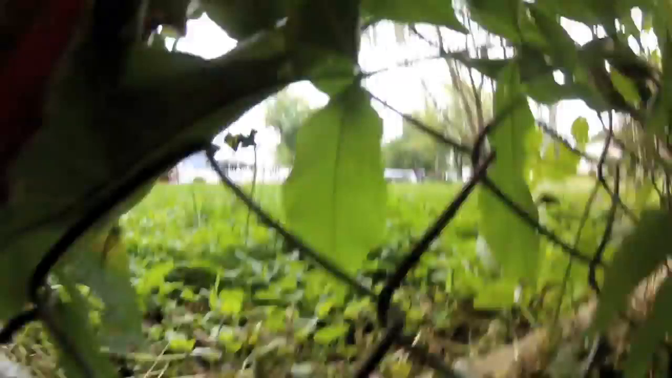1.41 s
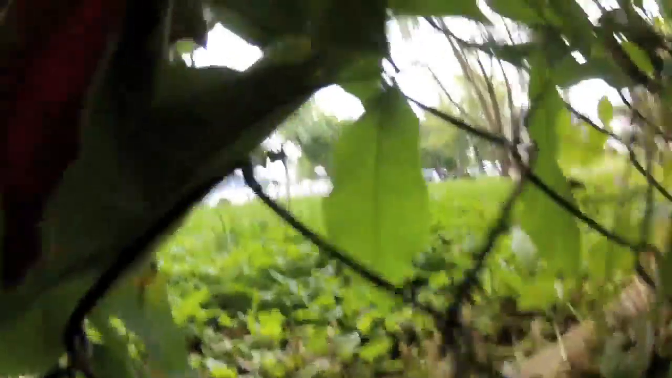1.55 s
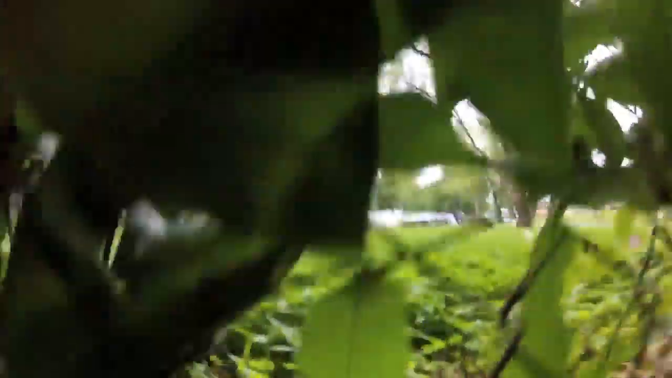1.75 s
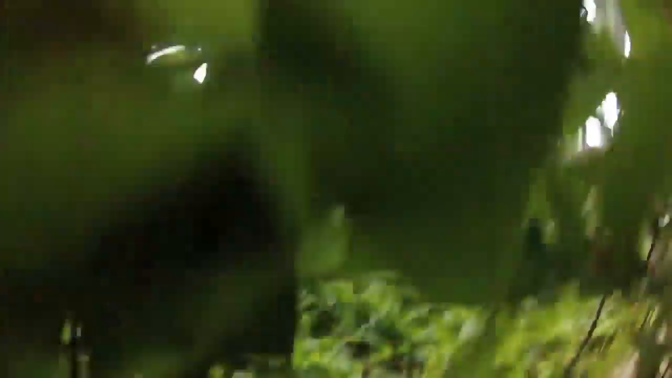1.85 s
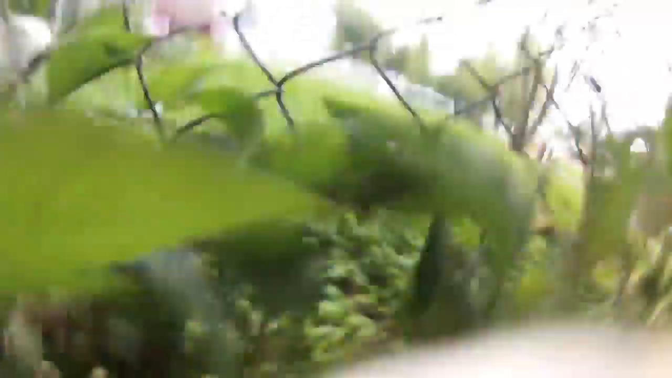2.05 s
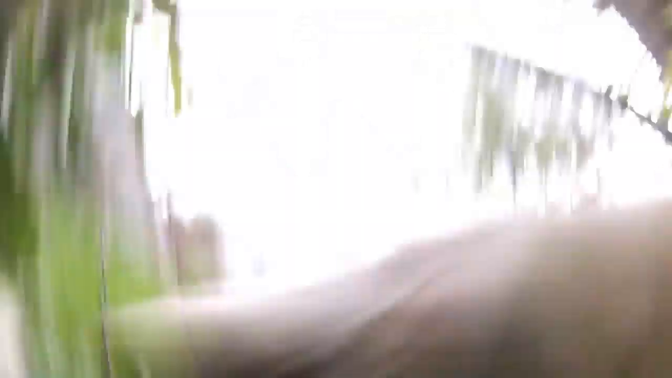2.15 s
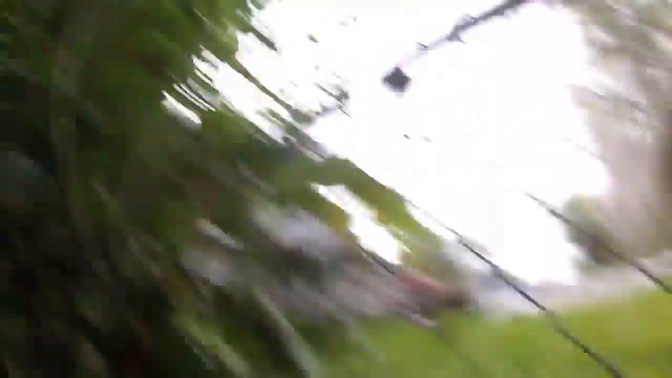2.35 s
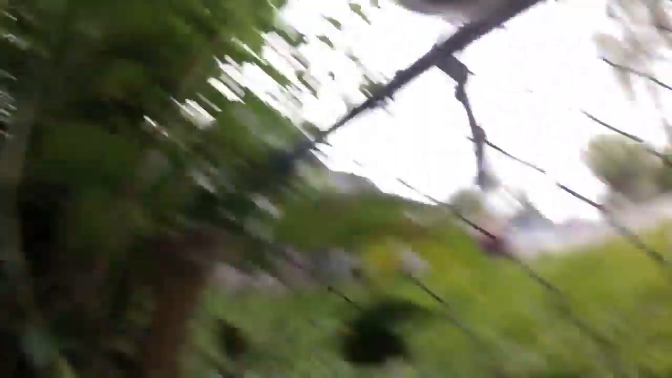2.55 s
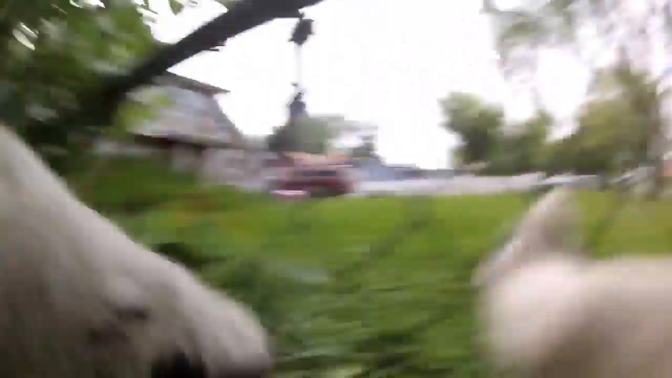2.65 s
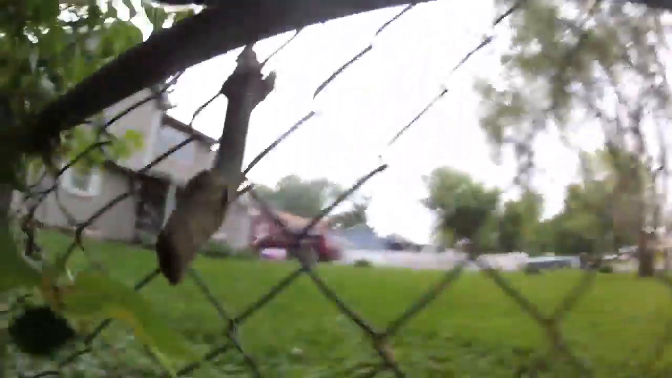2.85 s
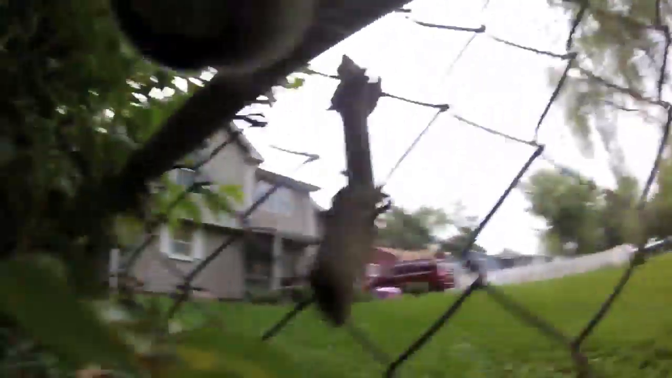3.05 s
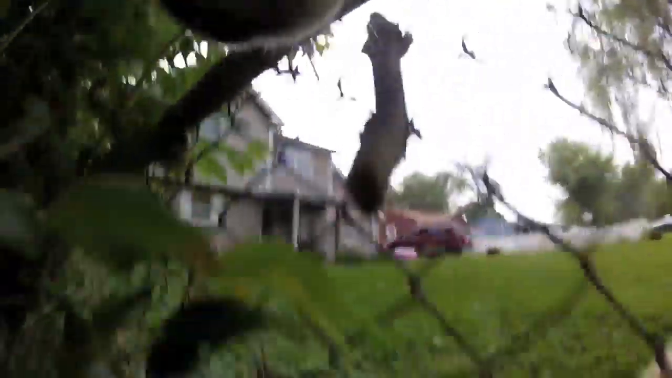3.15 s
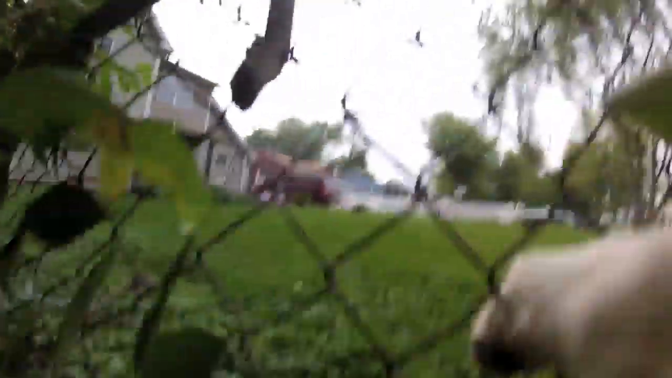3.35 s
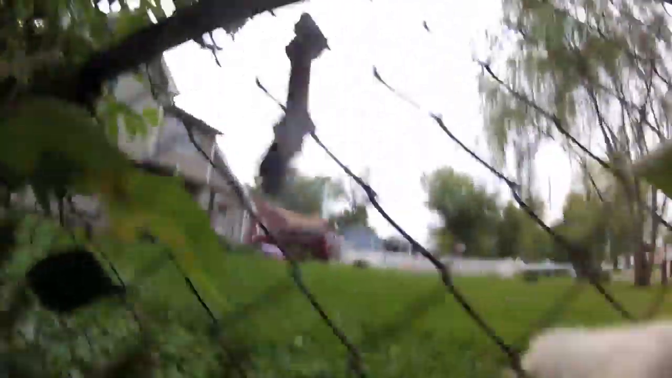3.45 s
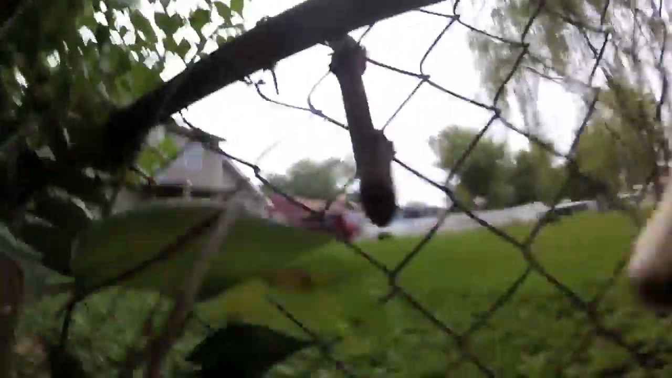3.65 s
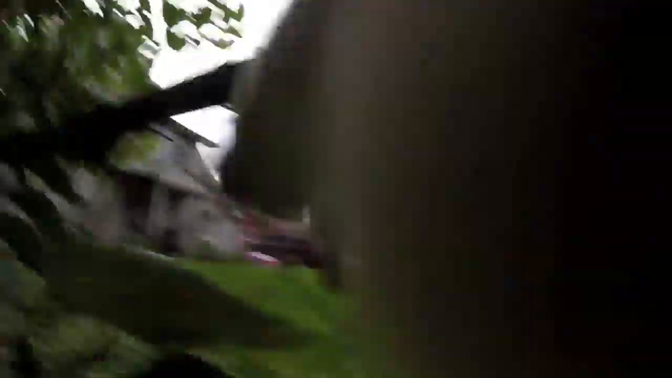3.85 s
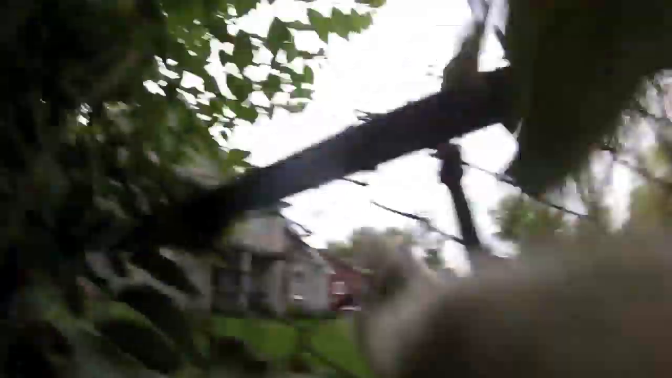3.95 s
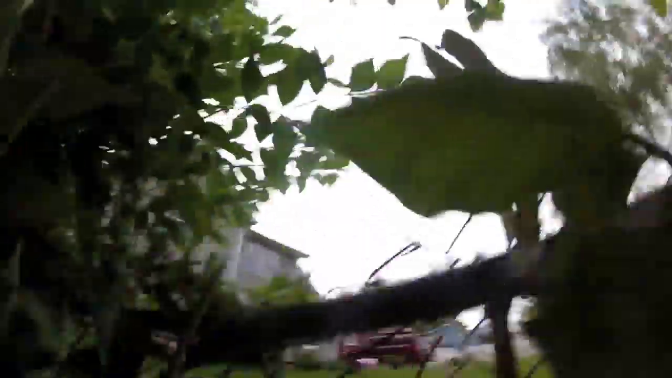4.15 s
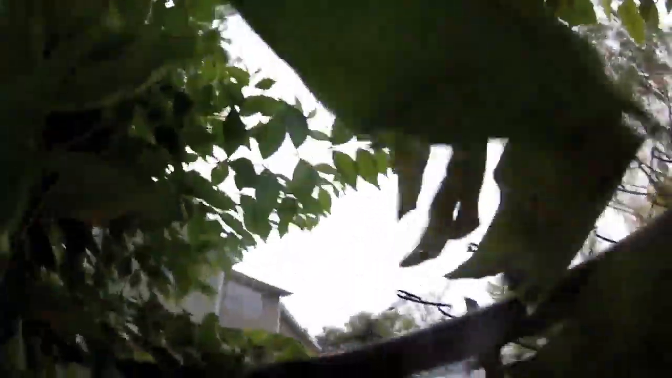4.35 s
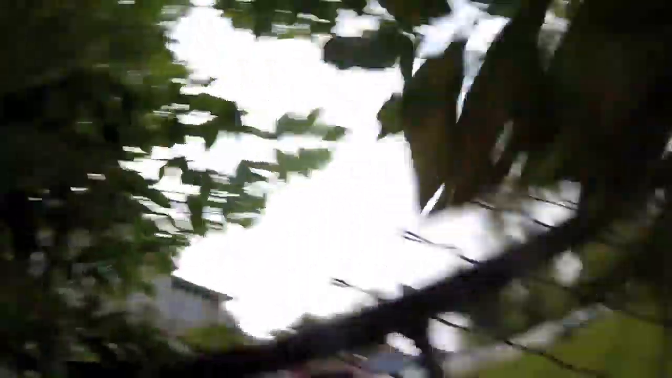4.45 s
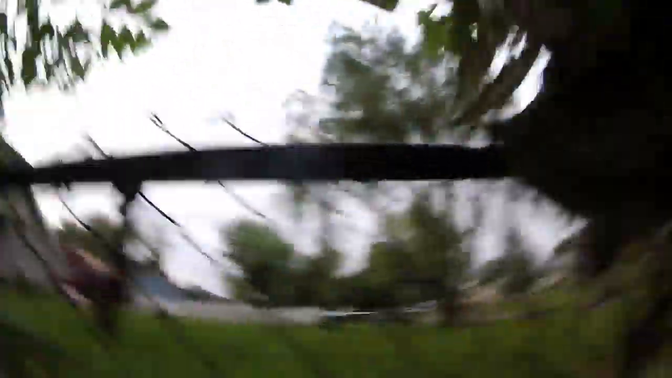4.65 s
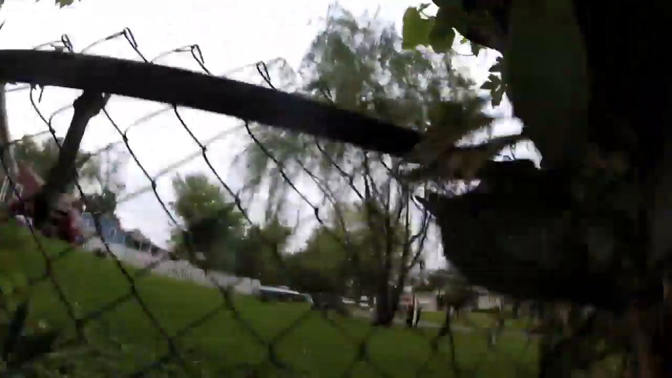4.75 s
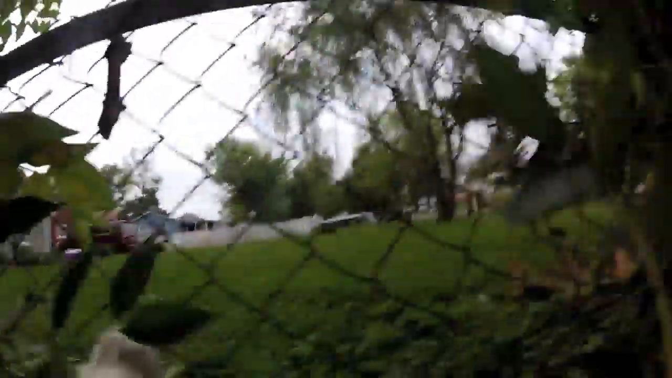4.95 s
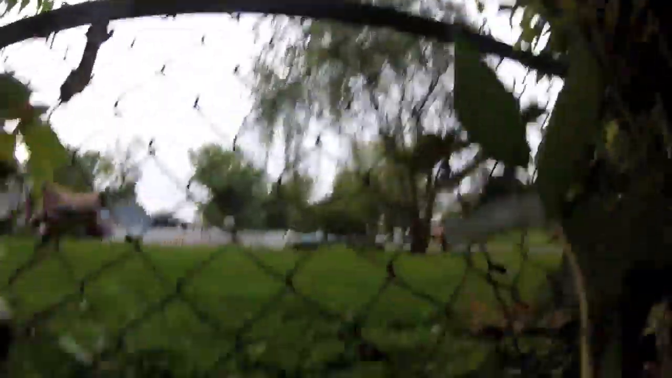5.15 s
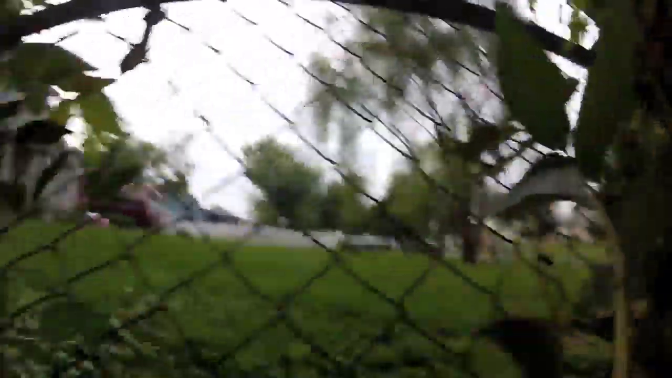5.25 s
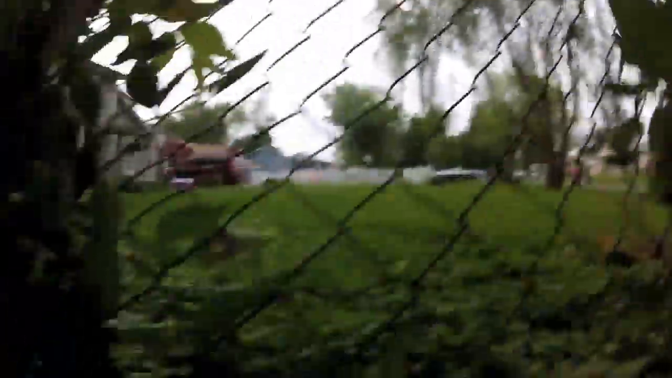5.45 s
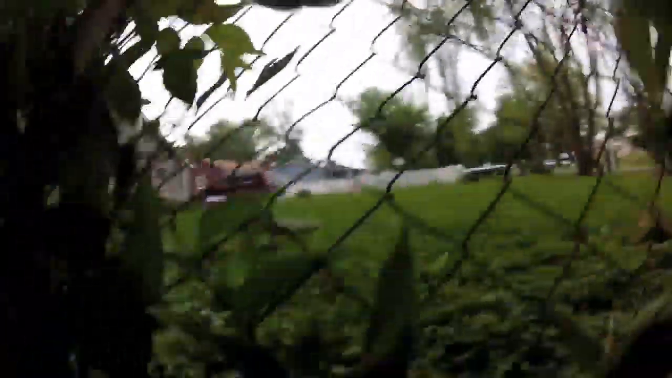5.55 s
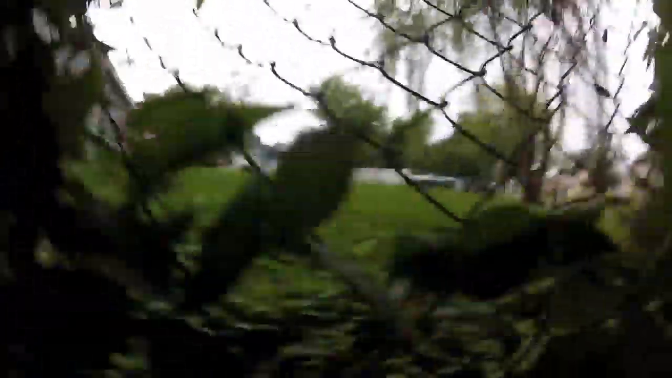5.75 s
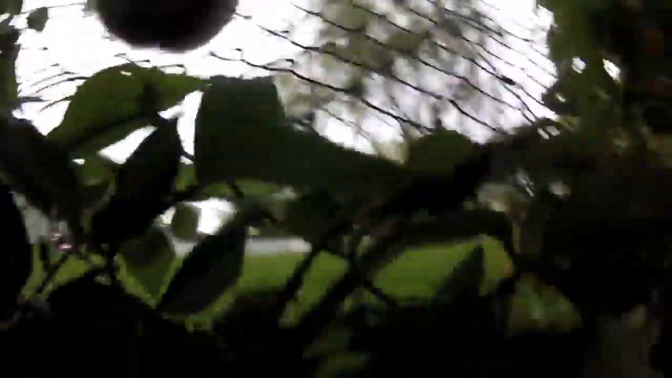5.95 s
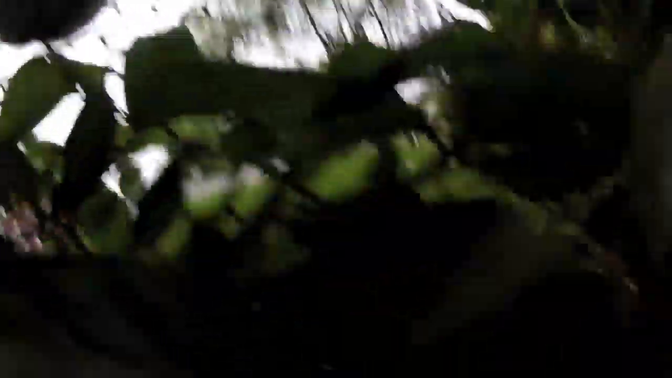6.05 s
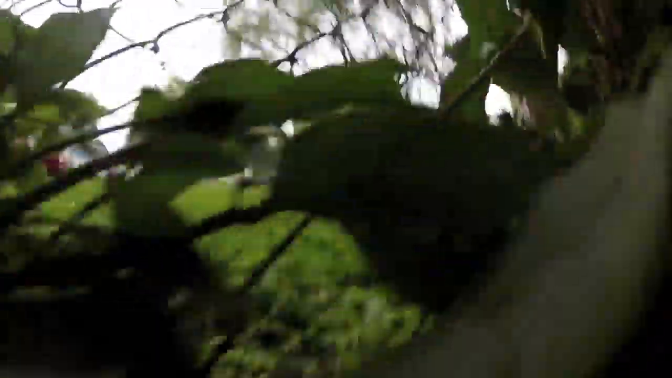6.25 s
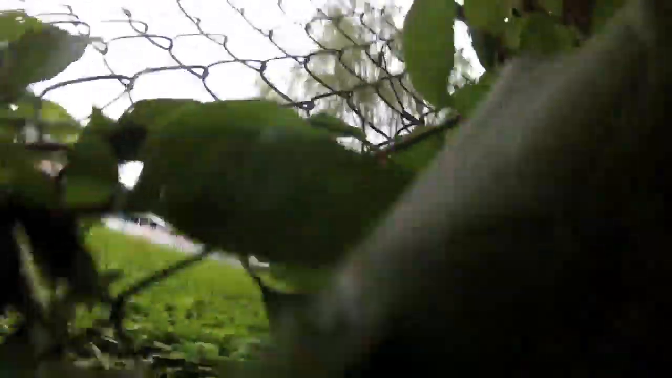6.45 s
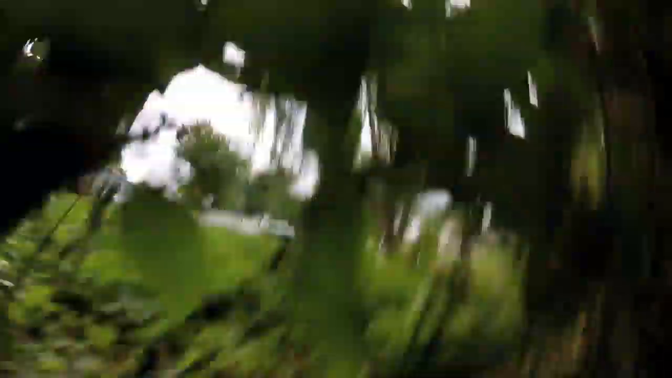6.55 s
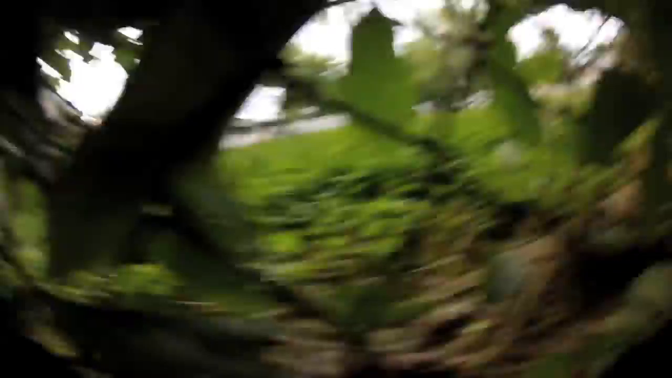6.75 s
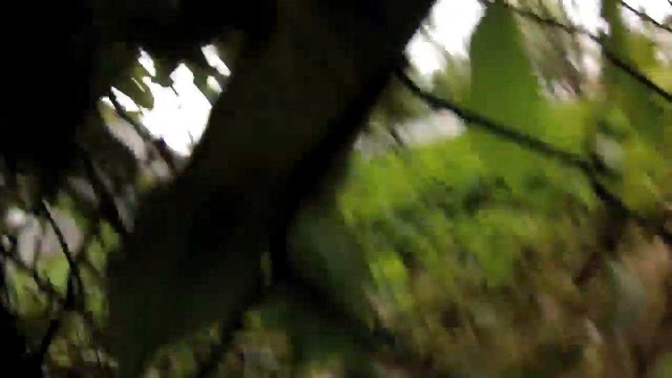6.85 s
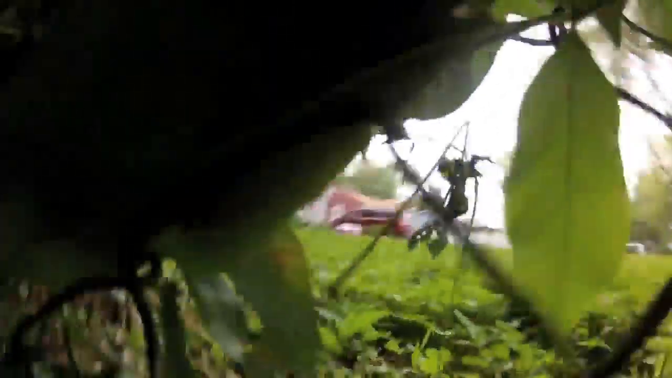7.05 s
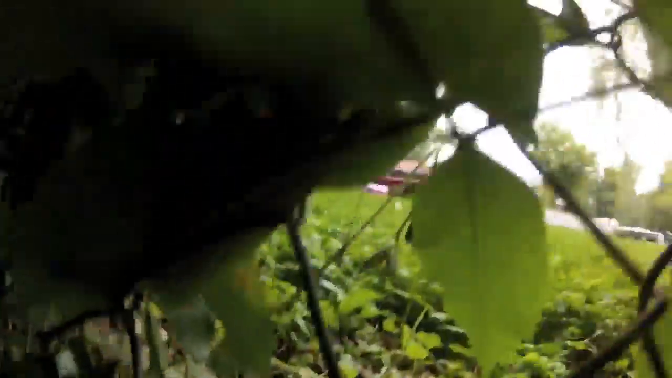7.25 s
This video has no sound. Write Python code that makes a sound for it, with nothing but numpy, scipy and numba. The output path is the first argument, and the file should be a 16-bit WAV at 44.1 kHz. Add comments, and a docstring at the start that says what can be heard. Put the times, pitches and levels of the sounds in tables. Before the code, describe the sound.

Leaves brush softly over a hard little case while stiff twigs click it. A sudden heavy blow at two seconds brings a cluster of cracks and scrapes, followed by quieter rubbing. A second burst of ratcheting ticks, short scrapes and tiny stem squeaks comes around five and a half to six seconds. Outdoors, but all contact sound at the microphone, without echo.

```python
"""Faint brushing and scattered dry ticks come first; about two seconds in, harder blows knock and rattle.
An animal carrying a small camera pushes through brush along a wire fence.
Twigs, stems and leaf tips ring the mount, shell, edge and microphone port as banks of resonances.
Leaves drag in bursts of tiny random slips and stems squeak as gliding tones.
The hardest blows overload the recorder: low pulses thump, the gain ducks and the peaks clip softly."""
import sys
import numpy as np
from scipy import signal
from scipy.fft import rfft, irfft, next_fast_len
from scipy.io import wavfile
from scipy.ndimage import map_coordinates
from numba import njit

SR = 44100
rng = np.random.default_rng(int(sys.argv[2]) if len(sys.argv) > 2 else 0)


def master_out(mix):
    """Clip the mix to full scale and print it as 16-bit PCM to the path in sys.argv[1]."""
    frames = np.transpose(np.atleast_2d(mix))
    ceiling = np.clip(frames, -1, 1)
    pcm = np.round(ceiling * 32767).astype(np.int16)
    wavfile.write(sys.argv[1], SR, pcm)


N = 322812


def amp(db):
    """Decibels to gain."""
    return 10 ** (np.asarray(db) / 20)


def unit(x):
    """Scale to rms 1."""
    return x / np.sqrt(np.mean(x ** 2) + 1e-20)


def colour(points):
    """Gain against frequency, drawn through (frequency [Hz], level [dB]) points on a log axis."""
    point_hz, db = np.transpose(points)
    return lambda hz: amp(np.interp(np.log(hz + 1), np.log(point_hz), db))


def filtered(x, response):
    """Shape the spectrum of x by a response of frequency; the padding keeps tails from wrapping round."""
    size = next_fast_len(N + 8192)
    hz = np.fft.rfftfreq(size, 1 / SR)
    return irfft(rfft(x, size) * response(hz), size)[:N]


def wobble(rate):
    """A smooth random curve with rate knots a second."""
    knots = rng.standard_normal(int(N * rate / SR) + 4)
    return map_coordinates(knots, [np.arange(N) * rate / SR])


def add(track, s, sound):
    """Mix a sound in at time s [s]."""
    start = max(round(s * SR), 0)
    part = track[start:start + len(sound)]
    part += sound[:len(part)]


def resonances(modes):
    """Causal response of a bank of damped modes with alternating signs."""
    def response(f):
        total = 0
        for k, (centre, width, db) in enumerate(modes):
            damping = 1j * f * width
            total = total + (-1) ** k * amp(db) * damping / (centre * centre - f * f + damping)
        return total
    return response


def ring(modes, force, scatter_db, detune):
    """Decaying modes rung by a force; each point of impact favours other modes and shifts their pitch."""
    t = np.arange(len(force)) / SR
    hz, width, db = np.transpose(modes)[:, :, None]
    size, shift = rng.uniform(-0.85, 1, (2, len(modes), 1))
    sign = (-1) ** np.arange(len(modes))[:, None]
    decay = np.exp(-np.pi * width * t)
    tones = np.sin(2 * np.pi * hz * (1 + detune * shift) * t)
    waves = sign * width * amp(db + scatter_db * size) * decay * tones
    sound = signal.fftconvolve(waves.sum(0), force)[:len(t)]
    # every ring carries the energy of 6 ms at rms 1
    return sound / np.sqrt(np.sum(sound ** 2) / (.006 * SR))


def friction(rate, spread_db, smooth):
    """Tiny slips of unequal size, on average rate a second, over a smooth hiss."""
    happens = rng.random(N) < rate / SR
    sign = rng.choice([-1, 1], N)
    size = amp(spread_db * np.clip(rng.standard_normal(N), -2, 2))
    return unit(unit(happens * sign * size) + smooth * rng.standard_normal(N))


# twigs striking the case: (time [s], shell ring level [dB], edge ring level [dB re shell])
TWIG_HITS = [(0.0368, -49, -10), (0.4018, -31.5, -16), (0.4659, -49.5, -23), (0.6607, -45.5, -23),
             (0.862, -57, -3), (1.0464, -47, -16), (1.2903, -32, -10.5), (1.449, -58, -11.5),
             (1.629, -32, -7.5), (1.798, -51.5, -5), (1.9136, -35, -12), (2.0566, -23.5, -2),
             (2.0723, -21.5, 1.5), (2.1261, -45.5, 0.5), (2.144, -39.5, -3.5), (2.2236, -29, 2.5),
             (2.2468, -28.5, -21), (2.2555, -45.5, 9.5), (2.2808, -30, 2), (2.3104, -41, -1),
             (2.3354, -57, 4), (2.4327, -41, 4), (2.5929, -34.5, 0.5), (2.6426, -46, -3),
             (2.6919, -33, 3.5), (2.697, -38, -15), (2.7212, -33, 3.5), (2.74, -41.5, 2.5),
             (2.7696, -41, 1.5), (2.902, -52.5, -2), (3.1481, -51, -1.5), (3.9131, -29, 0),
             (3.9579, -36, 0), (4.001, -42.5, -0.5), (4.0101, -42, -1), (4.3002, -36.5, -8),
             (4.6742, -57, 2.5), (5.045, -56.5, -4.5), (5.221, -54, -24), (5.4138, -45.5, -3),
             (5.4953, -45, -8), (5.6395, -37.5, -5), (5.6507, -30, -0.5), (5.7393, -39, 5),
             (5.7602, -31.5, 4), (5.7887, -39.5, -0.5), (5.8528, -30.5, -3.5), (5.9403, -28.5, -2.5),
             (5.9941, -48, -22), (6.056, -47, -1), (6.0826, -45, -20), (6.2645, -53.5, -1.5),
             (6.3218, -54, -3), (6.5735, -46, -11), (6.6081, -49, -13), (6.8329, -45, 0),
             (6.8885, -51.5, 3), (7.015, -28.5, -0.5), (7.068, -35, -10), (7.0882, -30.5, -10)]


def twigs(ordinary_db=-46.5, knock_db=-5, knock_fall=0.31):
    """Stiff twigs snap against the case; the harder they hit, the smaller the mount's share of the blow."""
    out = np.zeros(N)
    for s, db, edge in TWIG_HITS:
        # a twig of ordinary_db knocks the mount by knock_db re shell; knock_fall is dB less per dB harder
        knock = knock_db - knock_fall * (db - ordinary_db)
        add(out, s - LEAD_S, strike(db, edge, knock))
    return out


# resonances of the camera's mount, shell, edge and microphone port:
# (frequency [Hz], width [Hz], level [dB])
MOUNT_MODES = [(213, 234, -16), (401, 68, 1), (583, 188, -7), (668.5, 71, 1.5), (936, 170, -11.5)]
SHELL_MODES = [(1200, 130, -12.5), (1696, 155, -3), (2055, 190, 1), (2171, 165, 2.5)]
EDGE_MODES = [(2620, 133, -1.5), (2966, 93, -13.5), (3194, 73, -17.5), (3530, 160, -12), (3686, 220, -15),
              (4124, 130, -18.5), (5100, 170, -24)]
PORT_MODES = [(7800, 950, -30), (8520, 110, -6), (9100, 69, -9), (9346, 160, -1), (9884, 130, 0.5),
              (10120, 240, -6), (11430, 400, -3), (12970, 560, -11), (13210, 300, 4), (13600, 450, 1),
              (14760, 76, -3.5)]
LEAD_S = .004  # grazing time before the blow [s]


def strike(db, edge, knock, graze=0.0086, port_db=-11, crack_db=-13, crack_life=0.0023):
    """A contact grazes the case, hits with a dry crack, skids briefly and rings every part of it."""
    skid, skid_time = .07, .0028  # force re blow, fading time [s]
    t = np.arange(SR // 25) / SR - LEAD_S
    strength = np.where(t < 0, graze * (1 + t / LEAD_S), skid * np.exp(-(t / skid_time) ** 4))
    force = strength * rng.standard_normal(len(t))
    force[round(LEAD_S * SR)] += 1  # the blow itself
    mount = amp(knock) * ring(MOUNT_MODES, force, scatter_db=3, detune=0.053)
    shell = ring(SHELL_MODES, force, scatter_db=4.5, detune=0.045)
    rim = amp(edge) * ring(EDGE_MODES, force, scatter_db=5, detune=0.011)
    port = amp(port_db) * ring(PORT_MODES, force, scatter_db=6, detune=.002)
    crack_band = signal.butter(1, [700, 4500], "bandpass", fs=SR)
    crack_noise = unit(signal.lfilter(*crack_band, rng.standard_normal(len(t))))
    crack = amp(crack_db) * crack_noise * (t >= 0) * np.exp(-np.abs(t) / crack_life)
    hardness = np.hypot(1, amp(edge))  # more edge ring brings more port and crack
    return amp(db) * (mount + shell + rim + hardness * (port + crack))


# a twig catching again and again:
# (time [s], length [s], first catch level [dB], time between catches [s])
TWIG_SKIPS = [(0.7807, .04, -50.5, 0.0081), (2.157, .028, -43, 0.0096), (2.449, .018, -46.5, 0.011),
              (3.88, .018, -45, 0.0044), (5.655, .034, -41, 0.011), (5.713, .016, -41, .0063),
              (5.798, .013, -46, 0.0051), (5.872, .043, -39, .0092), (5.951, .047, -53, .0084),
              (6.9725, .038, -43, 0.013), (7.0784, .027, -42, 0.0061)]


def skips(knock_db=-11, edge_db=-6.5, fade_db_per_s=110, scatter_db=0.5, jitter_s=.0004):
    """A bent twig ratchets over the case, its catches weakening on the whole as it straightens."""
    out = np.zeros(N)
    for s, length, db, gap in TWIG_SKIPS:
        delays = np.arange(0, length, gap)
        scatter = rng.standard_normal((len(delays), 2))
        for delay, (late, size) in zip(delays, scatter):
            level = db - fade_db_per_s * delay + scatter_db * size
            time = s + delay + jitter_s * late
            add(out, time - LEAD_S, strike(level, edge_db, knock_db))
    return out


# soft, leafy stems on the mount: (time [s], knock level [dB])
STEM_THUDS = [(0.253, -59), (0.506, -51), (0.595, -47), (0.9417, -49), (1.478, -45), (1.695, -53.5),
              (2.0691, -27), (2.5403, -40), (2.853, -48.5), (3.095, -47.5), (4.0038, -41), (4.889, -51.5),
              (4.956, -52.5), (5.125, -57), (5.319, -46), (5.509, -52.5), (5.5846, -51.5), (6.3888, -52.5),
              (6.5682, -49), (7.2818, -64)]


def thuds(dull_db=8, edge_db=-10.5):
    """Soft stems knock the mount more than the shell, by dull_db; edge_db is the edge ring re shell."""
    out = np.zeros(N)
    for s, db in STEM_THUDS:
        add(out, s - LEAD_S, strike(db - dull_db, edge_db, dull_db))
    return out


# low thumps under the hardest blows, as the recorder overloads:
# (time [s], pulse level before decay [dB], frequency [Hz])
THUMPS = [(2.0692, -8, 148.7), (2.222, -30, 60), (2.281, -29, 60), (3.914, -33.5, 60), (5.651, -32, 170),
          (5.8534, -31, 60), (5.941, -30, 60), (7.0157, -31, 60)]


def thumps(life=0.001):
    """Each thump is a brief low pulse, a sine that dies within milliseconds."""
    out = np.zeros(N)
    t = np.arange(SR // 20) / SR
    for s, db, hz in THUMPS:
        fade = np.exp(-(t / (2 * life)) ** 2)
        add(out, s, amp(db) * np.sin(2 * np.pi * hz * t) * fade)
    return out


# leaves dragged over the case:
# (time [s], length [s], scrape level [dB], rub level [dB], pitch of the mount's groan [Hz])
LEAF_STROKES = [(0.016, 0.044, -57.5, -56, 336), (0.465, 0.11, -64, -57.5, 400),
                (0.752, 0.064, -61.5, -61.5, 620), (1.016, 0.067, -55, -59.5, 400),
                (1.249, 0.054, -53.5, -58.5, 396), (1.478, 0.053, -61.5, -59, 416),
                (1.957, 0.061, -58, -65.5, 650), (2.075, 0.015, -39, -49, 630),
                (2.107, 0.052, -55.5, -58, 690), (2.24, 0.025, -38.5, -38, 375),
                (2.317, 0.048, -61, -82, 680), (2.395, 0.081, -49.5, -52.5, 423),
                (2.543, 0.012, -49, -57, 665), (2.62, 0.05, -53, -49, 677), (2.72, 0.096, -59, -50.5, 405),
                (2.834, 0.041, -71, -56, 403), (3.013, 0.082, -65, -65, 413),
                (3.271, 0.12, -61.5, -61.5, 680), (3.585, 0.13, -65.5, -64.5, 650),
                (3.856, 0.054, -50.5, -53.5, 399), (3.972, 0.08, -58, -51, 386),
                (4.149, 0.076, -64, -62, 394), (4.435, 0.048, -64.5, -63.5, 396),
                (4.281, 0.026, -47.5, -53.5, 696), (4.648, 0.14, -57, -54, 702),
                (5.395, 0.058, -64, -52.5, 372), (5.6, 0.039, -78, -52, 621),
                (5.641, 0.035, -39.5, -44, 410), (5.731, 0.028, -37, -43.5, 336),
                (5.88, 0.06, -58, -55.5, 734), (5.95, 0.11, -59.5, -68, 696), (6.071, 0.036, -53, -55, 660),
                (6.146, 0.028, -55, -49, 470), (6.188, 0.025, -59.5, -49, 554),
                (6.223, 0.067, -56, -70, 730), (6.419, 0.031, -57.5, -58.5, 630),
                (6.743, 0.023, -54.5, -61.5, 720), (6.77, 0.09, -54.5, -56.5, 710),
                (6.894, 0.11, -51, -56.5, 685), (6.97, 0.054, -45, -54, 660)]


def strokes(rub_width_hz=80, broad=0.52, crackle_db=-5):
    """A leaf catches, judders over the case in uneven slips and lets go; its drag makes the mount groan."""
    rise, hold, release = 0.18, 0.84, 0.23  # shares of the length: full grip, letting go, fading time
    out = np.zeros(N)
    judder = amp(3.6 * wobble(190))
    slips = friction(rate=1800, spread_db=2, smooth=.6)
    crackle = amp(crackle_db)
    scrape = scraping(judder * slips, fizz_db=-9.5) + crackle * ticking(rate=140, spread_db=-1.5, port_db=-9.5)
    drag = judder * friction(rate=700, spread_db=2.0, smooth=0.78)
    rub = unit(filtered(drag, colour(RUB_COLOUR)))
    for s, length, scrape_db, rub_db, hz in LEAF_STROKES:
        span = slice(round(s * SR), round((s + 2 * length) * SR))
        progress = np.arange(len(drag[span])) / (length * SR)
        swell = np.minimum(progress / rise, 1) * np.exp(-np.maximum(progress - hold, 0) / release)
        groan = unit(signal.lfilter(*signal.iirpeak(hz, hz / rub_width_hz, SR), drag[span]))
        add(out, s, amp(scrape_db) * swell * unit(scrape[span]))
        add(out, s, amp(rub_db) * swell * unit(groan + broad * rub[span]))
    return out


# broad colour of leaves scraping the shell: (frequency [Hz], level [dB])
SCRAPE_COLOUR = [(150, -23), (400, -10.5), (1000, -3), (1350, -6.5), (1750, -1.5), (1950, 1.5), (2200, -1),
                 (2750, -3), (3150, -9), (3600, -10.5), (4600, -16.5), (6000, -27), (7500, -25),
                 (12000, -59)]


def scraping(slips, fizz_db):
    """Leaf slips sound in the shell's broad colour, with the port's resonances fizzing far above."""
    shell = unit(filtered(slips, colour(SCRAPE_COLOUR)))
    return shell + amp(fizz_db) * unit(filtered(slips, resonances(PORT_MODES)))


def ticking(rate, spread_db, port_db):
    """Leaf tips flick the shell, edge and port modes at random, on average rate a second."""
    tips = friction(rate, spread_db, smooth=0)
    case = unit(filtered(tips, resonances(SHELL_MODES + EDGE_MODES)))
    return case + amp(port_db) * unit(filtered(tips, resonances(PORT_MODES)))


# stems that stick and slip:
# (time [s], length [s], fundamental's peak level [dB], first slip rate [Hz], last slip rate [Hz])
STEM_SQUEAKS = [(5.39, 0.024, -41, 437, 380), (6.141, 0.023, -41, 397, 647), (6.19, 0.026, -42.5, 711, 352)]


def squeaks(rasp=0.26, unsteady=0.07):
    """A stem sticks and slips in a brief, nearly regular run whose rate glides unsteadily."""
    out = np.zeros(N)
    for s, length, db, first_hz, last_hz in STEM_SQUEAKS:
        progress = np.linspace(0, 1, round(length * SR))
        glide = np.interp(progress, [0, 1], [first_hz, last_hz])
        rate = glide * (1 + unsteady * wobble(216.4)[:len(progress)])
        phase = 2 * np.pi * np.cumsum(rate) / SR
        # the only overtones are the third and fourth harmonics, around the shell's resonances, added to the
        # fundamental
        overtones = np.sin(3 * phase) + np.sin(4 * phase)
        swell = np.sin(np.pi * progress)
        add(out, s, amp(db) * swell * (np.sin(phase) + rasp * overtones))
    return out


# how hard the foliage presses, as the mount's rubbing before trim and grip: (time [s], level [dB])
PRESS = [(0.0, -65.5), (0.28, -68), (0.59, -63), (0.88, -63.5), (1.26, -68), (1.96, -63.5), (2.08, -63.5),
         (2.36, -57.5), (2.67, -57), (2.85, -63.5), (3.08, -62.5), (3.22, -61.5), (3.44, -67), (3.61, -66),
         (4.08, -62), (4.4, -65), (5.16, -66), (5.81, -60.5), (6.4, -63), (6.52, -61.5), (6.97, -63.5),
         (7.07, -64), (7.26, -68), (7.32, -62)]
# broad colour of the mount rubbing: (frequency [Hz], level [dB])
RUB_COLOUR = [(25, -9.5), (80, -13.5), (200, -7), (300, -3.5), (400, 2), (530, -8.5), (680, 3),
              (850, -11.5), (1200, -11.5), (2000, -31), (4000, -28.5)]


def sliding(rub_db=-1.0, scrape_db=-4.5, grip_db=2.5, tick_db=-5, jolt_db=-3):
    """Foliage brushes lightly over the case, its tips ticking, while the mount shifts on fur."""
    light_db, scrape_grows = -64.5, 1.33  # a light touch; dB of scrape per dB of pressure relative to it
    pressure = np.interp(np.arange(N) / SR, *np.transpose(PRESS))
    scrape = light_db + scrape_grows * (pressure - light_db)
    # grip [dB] varies from moment to moment, partly alike for fur and leaves
    shared = wobble(22)
    fur_grip, leaf_grip = grip_db * (shared + .7 * np.array([wobble(50), wobble(50)]))
    slips = friction(rate=900, spread_db=3, smooth=.7)
    leaves = scraping(slips, fizz_db=-12.0) + amp(tick_db) * ticking(rate=20, spread_db=2, port_db=-9)
    jolts = unit(filtered(friction(rate=45, spread_db=2, smooth=0), resonances(MOUNT_MODES)))
    rub = unit(filtered(rng.standard_normal(N), colour(RUB_COLOUR)))
    mount = unit(rub + amp(jolt_db) * jolts)
    return amp(pressure + rub_db + fur_grip) * mount + amp(scrape + scrape_db + leaf_grip) * leaves


def scene():
    """All contacts and the low thumps sum to one mono track."""
    return (sliding() + strokes() + squeaks() + thumps() + twigs() + thuds() + skips())[None]


@njit
def follower(level, attack, release):
    """An envelope that rises fast and falls slowly (shares per sample)."""
    out, held = np.empty_like(level), 0.
    for i in range(len(level)):
        held += (level[i] - held) * (attack if level[i] > held else release)
        out[i] = held
    return out


# microphone behind its small port: (frequency [Hz], level [dB])
MIC_COLOUR = [(15, -15), (50, 2.5), (4500, -2), (5300, -2), (6100, -9), (7200, 1), (10500, 3.5),
              (11300, -9.5), (12000, -7.5), (13000, -12), (15000, 6.5), (16000, -52)]
TOP_HZ = 16400  # nothing passes from here up


def record(dry, knee_db=-23, attack=0.0026, release=0.0088, ceiling_db=-22.5, lopsided=0.031):
    """Gain ducks after hard blows (times in s), peaks clip unevenly, then port colour and band limit."""
    x = dry[0]
    held = follower(np.abs(x), 1 / (attack * SR), 1 / (release * SR))
    ducked = x / np.maximum(1, held / amp(knee_db))
    # the ceiling is a little lower for positive peaks
    ceiling = amp(ceiling_db) * (1 - lopsided * np.sign(ducked))
    clipped = ducked / (1 + (ducked / ceiling) ** 4) ** (1 / 4)
    return filtered(clipped, lambda hz: colour(MIC_COLOUR)(hz) * (hz < TOP_HZ))[None]


dry = scene()
out = record(dry)
master_out(out)
```